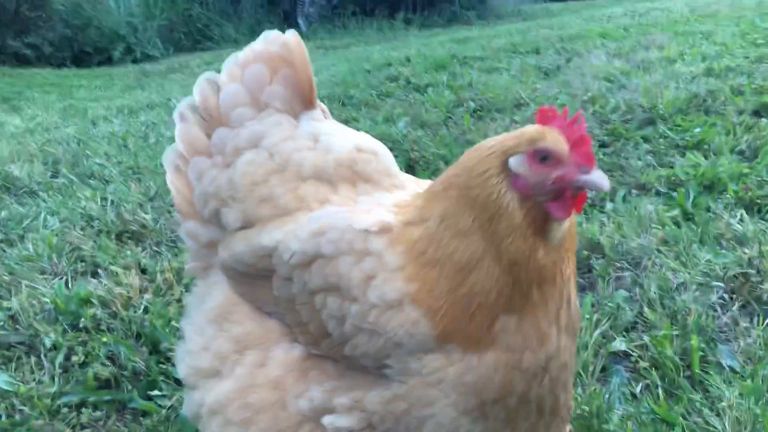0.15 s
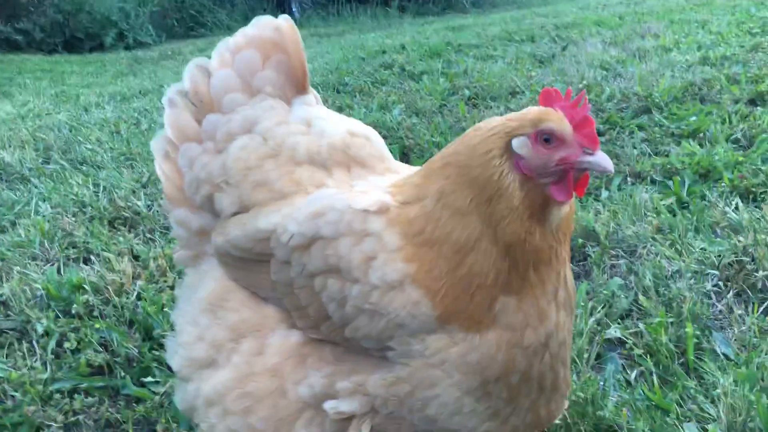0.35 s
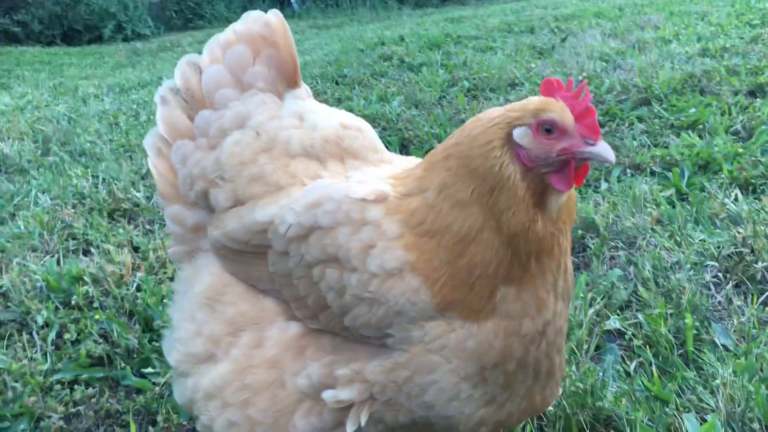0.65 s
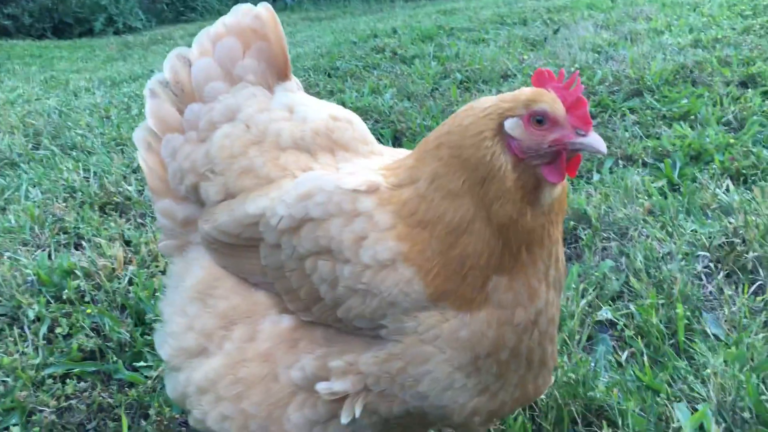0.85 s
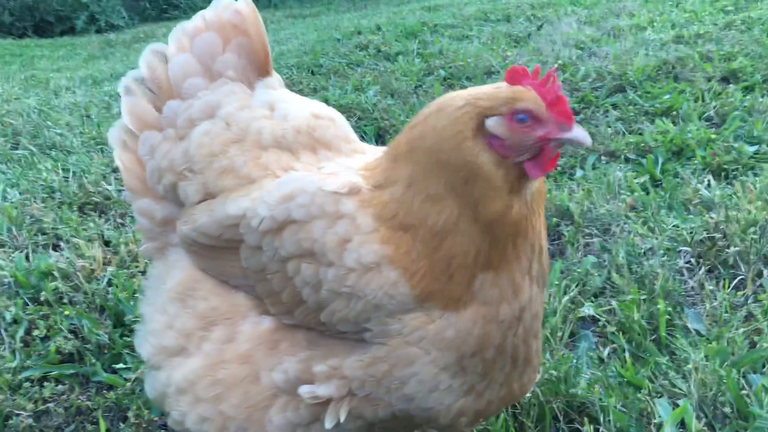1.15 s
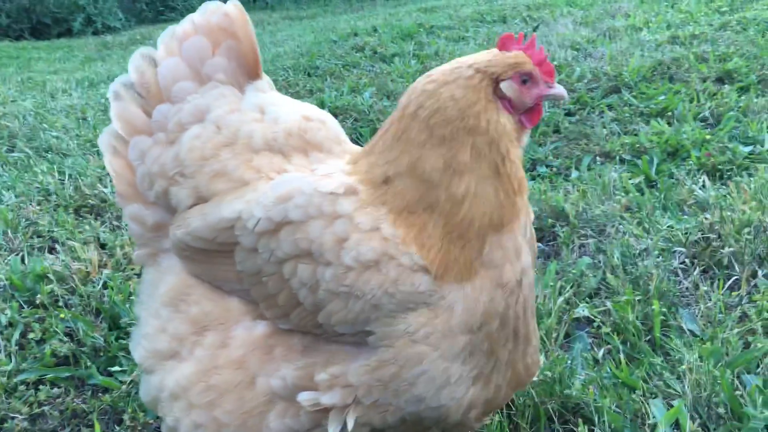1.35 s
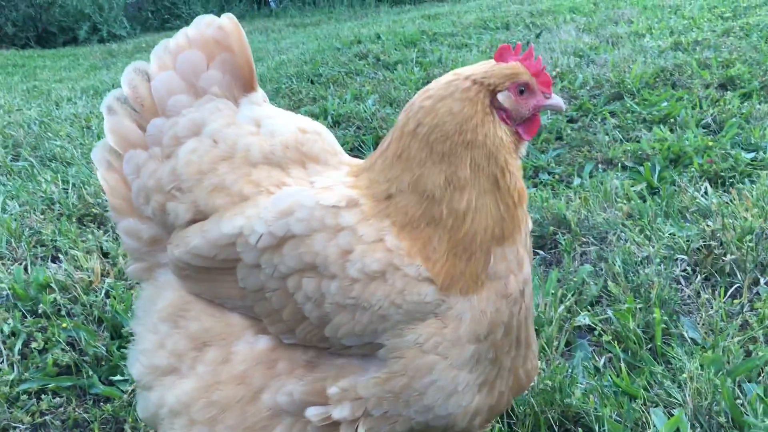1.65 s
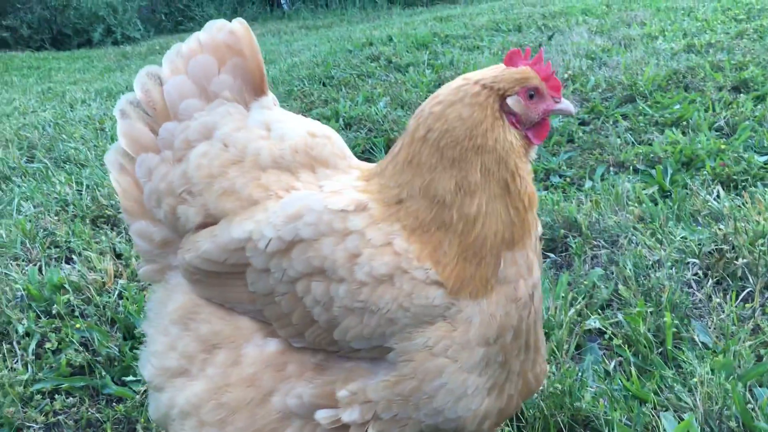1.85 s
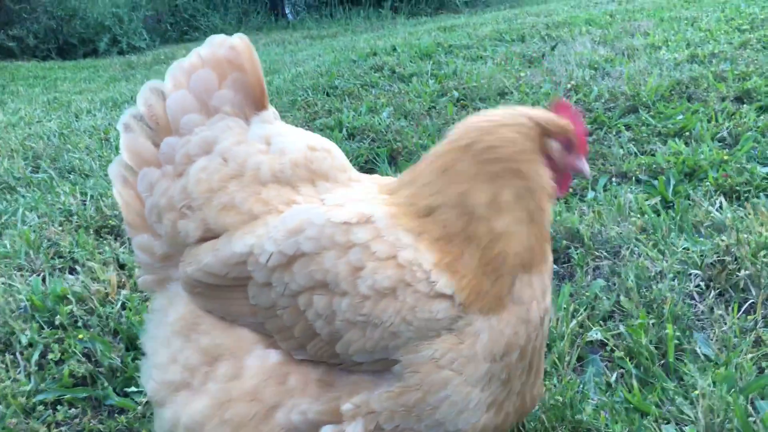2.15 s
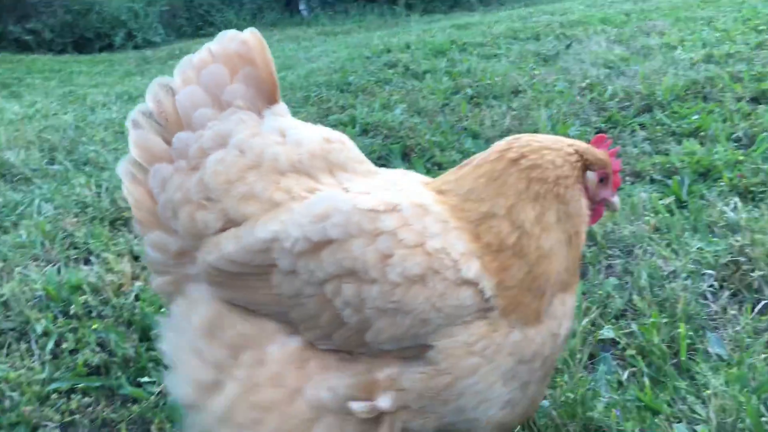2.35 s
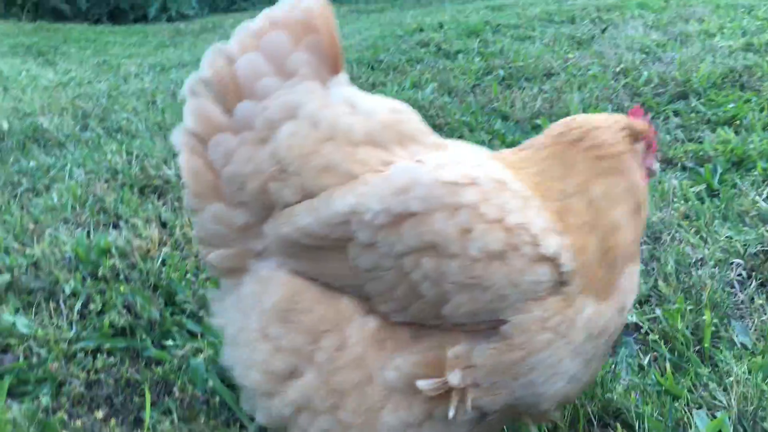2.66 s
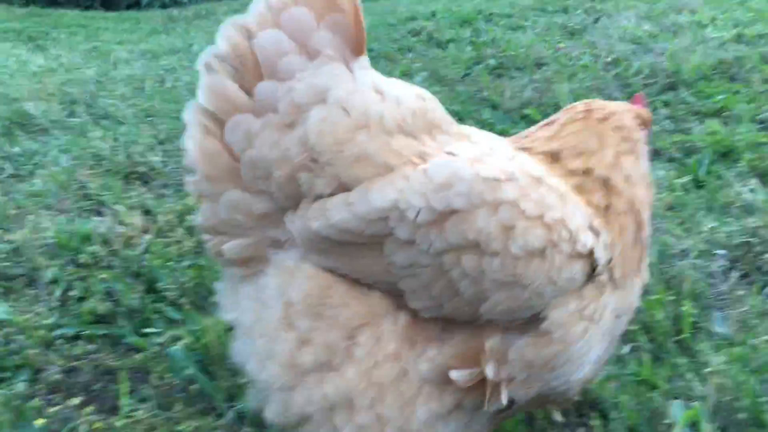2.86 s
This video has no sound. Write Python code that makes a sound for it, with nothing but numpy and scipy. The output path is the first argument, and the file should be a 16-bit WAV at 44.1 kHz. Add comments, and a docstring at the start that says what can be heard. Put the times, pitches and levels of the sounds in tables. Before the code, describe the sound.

Close hen calls on an open lawn: one dull cluck, a quick throaty rattle, a near-silent gap, then soft clucks and pops, over faint bird chirps, slight rustling and a low distant hum.

```python
"""On a lawn, a hen close by gives short clucks, single pops and one fluttering growl.
Her voice is made of membrane pulses and breath that ring windpipe, chest, beak and throat resonances.
Far birds chip and whistle as falling sine notes with a scattered echo.
Grass and feathers rustle as swells of grainy noise.
Distant traffic rumbles as coloured noise, with a hum made by a narrow noise resonance."""
import sys
import numpy as np
from scipy import signal
from scipy.io import wavfile
from scipy.ndimage import uniform_filter1d

SR = 44100
rng = np.random.default_rng(int(sys.argv[2]) if len(sys.argv) > 2 else 0)


def attenuation_scalar(level_db):
    """Turn a level in dB into a linear amplitude multiplier (20 dB per decade)."""
    decades = np.asarray(level_db, float) / 20
    return 10 ** decades


def output_pcm(signal):
    """Save a mono or channel-first signal as 16-bit PCM at the path in sys.argv[1].

    Samples are clipped to [-1, 1] before scaling.
    """
    pcm = np.clip(np.atleast_2d(signal).T, -1, 1) * 32767
    wavfile.write(sys.argv[1], SR, np.round(pcm).astype(np.int16))


N = 132300  # samples, 3 s


def rms_one(x):
    """Scale to rms 1."""
    return x / np.sqrt(np.mean(x ** 2) + 1e-20)


def add(out, start_s, piece):
    """Mix a piece in at its start time, trimming what falls outside."""
    i = int(start_s * SR)
    piece = piece[max(-i, 0):max(N - i, 0)]
    out[max(i, 0):max(i, 0) + len(piece)] += piece


def resonance(x, hz, width_hz):
    """Two-pole resonance, gain 1 on top."""
    r = np.exp(-np.pi * width_hz / SR)
    feedback = [1, -2 * r * np.cos(2 * np.pi * hz / SR), r * r]
    return signal.lfilter([(1 - r * r) / 2, 0, (r * r - 1) / 2], feedback, x)


def double_resonance(x, hz, half_width_hz):
    """Two equal resonances in a row, each twice half_width_hz wide: steeper sides than one."""
    once = resonance(x, hz, 2 * half_width_hz)
    return resonance(once, hz, 2 * half_width_hz)


def lowpass(x, cut_hz):
    """Fourth-order filter that keeps the sound below cut_hz."""
    return signal.sosfilt(signal.butter(4, cut_hz, fs=SR, output="sos"), x)


def drift(rate_hz):
    """Random wandering, spread 1: noise smoothed by two equal poles, made at every 40th sample."""
    r = np.exp(-2 * np.pi * rate_hz * 40 / SR)
    noise = rng.standard_normal(N // 40 + 2002)
    slow = rms_one(signal.lfilter([1], [1, -2 * r, r * r], noise)[2000:])
    return np.interp(np.arange(N) / 40, np.arange(len(slow)), slow)


def coloured(spectrum, patchy_db):
    """Third-octave bands of noise, each with its level and slow flicker; rms 1."""
    out = 0
    white = rng.standard_normal((2, N + 8000))  # neighbouring bands use different noise
    edges = 22 * 2 ** np.arange(0, 9.7, 1 / 3)
    hz, db = np.transpose(spectrum)
    for k, (low, high) in enumerate(zip(edges, edges[1:])):
        bandpass = signal.butter(2, [low, high], "band", fs=SR, output="sos")
        band = signal.sosfilt(bandpass, white[k % 2])[8000:]
        level_db = np.interp(np.log(low * high) / 2, np.log(hz), db)
        out = out + band * attenuation_scalar(level_db + patchy_db * drift(9.0))
    return rms_one(out)


# colour of the far traffic and air: (pitch_hz, relative level_db per Hz)
FLOOR_COLOUR = [(15, -34), (25, -22.5), (49, -2), (75, -2.5), (115, -7), (150, -10), (237, -11), (271, -24),
                (301, -18.5), (404, -24), (588, -27), (729, -24.5), (790, -26), (978, -21.5), (1090, -20),
                (1350, -22.5), (2930, -42), (3830, -44), (5570, -47.5), (7280, -50), (15000, -56)]
FLOOR_DB, HUM_DB = -50.5, -57  # rms levels
HUM_HZ, HUM_WIDTH_HZ = 91, 4


def background():
    """Far traffic and air as coloured noise; noise through a narrow resonance makes a wavering hum."""
    hum = resonance(rng.standard_normal(N + SR), HUM_HZ, HUM_WIDTH_HZ)[SR:]
    floor = coloured(FLOOR_COLOUR, patchy_db=0.5)
    return attenuation_scalar(FLOOR_DB) * floor + attenuation_scalar(HUM_DB) * rms_one(hum)


# swells of rustling grass and feathers: (centre_s, length_s, level_db)
RUSTLES = [(.005, .03, -69.5), (2.157, 0.005, -63), (2.18, 0.055, -72.5), (2.209, 0.018, -72),
           (2.607, 0.17, -70.5), (2.683, 0.058, -70.5), (2.929, 0.1, -63), (2.982, 0.053, -71)]
# colour of the rustling: (pitch_hz, relative level_db per Hz)
RUSTLE_COLOUR = [(1500, -20), (3000, -2), (4500, -2.5), (7000, -4.5), (10000, -7.5), (13000, -7),
                 (15500, -5)]


def rustles():
    """Bright noise under short swells; quick chance changes of level make it grainy."""
    swells = np.zeros(N)
    for centre_s, length_s, db in RUSTLES:
        add(swells, centre_s - length_s / 2, attenuation_scalar(db) * np.hanning(int(length_s * SR)))
    grain = attenuation_scalar(2.0 * drift(150.))
    return swells * coloured(RUSTLE_COLOUR, patchy_db=1.0) * grain


def far_notes(notes, echo_db, bend):
    """Falling sine notes with a noise echo that dies 60 dB per 0.7 s and stops after 0.5 s."""
    out = np.zeros(N)
    for start_s, length_s, first_hz, last_hz, db in notes:
        u = np.arange(int(length_s * SR)) / (length_s * SR)
        hz = last_hz + (first_hz - last_hz) * (1 - u) ** bend  # a higher bend falls sooner
        tone = np.sin(2 * np.pi * np.cumsum(hz) / SR)
        swell = np.sin(np.pi * u) ** .6
        add(out, start_s, attenuation_scalar(db + 3) * swell * tone)  # a sine peaks 3 dB above its rms
    decay = attenuation_scalar(-60 * np.arange(SR // 2) / SR / .7)
    tail = rng.standard_normal(SR // 2) * decay
    echo = signal.fftconvolve(out, tail / np.linalg.norm(tail))[:N]
    return out + attenuation_scalar(echo_db) * echo


# chips of far birds: (start_s, length_s, first_hz, last_hz, level_db)
CHIPS = [(.489, 0.024, 5390, 5060, -66), (1.628, 0.022, 5480, 5030, -62.5)]


def chips():
    """Very short far notes whose pitch falls fastest at the start."""
    return far_notes(CHIPS, echo_db=-3, bend=2.2)


# whistles of far birds: (start_s, length_s, first_hz, last_hz, level_db)
WHISTLES = [(1.62, 0.062, 3000, 2650, -70.5), (2.03, 0.11, 2750, 2340, -69.5),
            (2.13, 0.017, 2700, 2450, -62), (2.565, 0.033, 2780, 2525, -70.5),
            (2.79, 0.099, 4900, 4840, -76)]


def whistles():
    """Far notes that fall almost evenly, with a weaker echo than the chips."""
    return far_notes(WHISTLES, echo_db=-8, bend=1.18)


BODY_HZ, BODY_DB = 320, -9.5  # low chest resonance, gain
WINDPIPE_WIDTH_HZ, BEAK_HALF_WIDTH_HZ = 200, 180
RASP_CUT_HZ = 5900
BREATH_LINGERS, BURST_POINT = 1.3, 2.0  # in a burst: breath length over pulse length, pointedness
JITTER, SHIMMER_DB = .025, 1.5  # unevenness of pulse timing (share of pitch) and of pulse strength
GLIDE_FROM, LEAP_DB = .72, -2  # first share of the slow pitch; pulse strength after the leap
SECOND_BEAK, SECOND_BEAK_DB = 1.3, -6  # upper beak resonance: multiple of beak pitch, gain before treble_db
# other throat resonances, one below the beak's pitch stronger than the beak:
# (pitch_hz, half_width_hz, gain_db over the beak's, before treble_db)
THROAT = [(1291, 173, 5), (2066, 90, -6.5), (5720, 230, -22.5), (7200, 170, -18.5), (8350, 430, -13)]


def voice(length_s, slow_hz, leap, rise, windpipe_hz, db, beak_hz, rasp_db, treble_db, fall):
    """Membrane pulses and breath under a swell ring the windpipe, chest, beak and throat."""
    is_burst = leap == 0  # leap, rise and fall are shares of the length
    noise = rng.standard_normal((2, 2600))
    u = np.arange(2600) / (length_s * SR)
    swell = np.clip(np.minimum(u / rise, (1 - u) / fall), 0, 1) ** (BURST_POINT if is_burst else 1)
    puff_u = np.clip(u / (BREATH_LINGERS if is_burst else 1), 0, 1)
    puff = np.sin(np.pi * puff_u) ** (.8 if is_burst else .35)

    # slow pulses glide up, then leap to the windpipe's pitch at a pulse
    slow = slow_hz * np.interp(u, [0, leap / 2], [GLIDE_FROM, 1])
    beats = np.cumsum(slow) / SR + .5
    leap_beat = np.round(beats[int(leap * length_s * SR)])
    before = (beats < leap_beat) & (leap > 0)
    pitch = np.where(before, slow, windpipe_hz)
    wobble = rms_one(uniform_filter1d(noise[0], size=60))
    cycles = np.cumsum(pitch * (1 + JITTER * ~before * wobble)) / SR + .5

    strength = np.where(u < leap, 1, attenuation_scalar(LEAP_DB)) * attenuation_scalar(SHIMMER_DB * noise[0])
    pulses = np.diff(np.floor(cycles), prepend=0) * swell * strength
    # breath is strongest right after each pulse
    breath = noise[1] * puff * np.exp(-2.0 * (cycles % 1)) * np.sqrt(slow_hz / SR)

    windpipe = resonance(pulses, windpipe_hz, WINDPIPE_WIDTH_HZ)
    chest = resonance(pulses * (u < leap), BODY_HZ, 180.0) * attenuation_scalar(BODY_DB)
    soft = lowpass(windpipe + chest, 1300.)
    rasp = lowpass(.44 * pulses + 1.12 * breath, RASP_CUT_HZ)
    beak = double_resonance(rasp, beak_hz, BEAK_HALF_WIDTH_HZ)
    upper = beak
    for hz, half_width_hz, gain_db in THROAT + [(beak_hz * SECOND_BEAK, BEAK_HALF_WIDTH_HZ, SECOND_BEAK_DB)]:
        gain = attenuation_scalar(gain_db + treble_db * (hz > beak_hz))
        upper = upper + gain * double_resonance(rasp, hz, half_width_hz)
    return attenuation_scalar(db) * (soft / np.abs(soft).max() + attenuation_scalar(rasp_db) * upper / np.abs(beak).max())


# clucks: (start_s, length_s, slow_hz, share before the pitch leaps to the windpipe's,
# share spent swelling, windpipe_hz)
CLUCKS = [(.2477, .022, 335, .6, .3, 665), (2.1218, .013, 310, .5, .1, 705),
          (2.4116, .026, 320, .64, .1, 660)]
# colour of each cluck: (level_db, beak_hz, rasp_db against the soft part, treble_db of the rasp)
CLUCK_COLOURS = [(-25.5, 3300, -25.5, 0), (-31, 4020, -26.5, 8.5), (-31, 3670, -21.5, 1.5)]


def clucks():
    """A few slow pulses that leap up to windpipe pitch."""
    out = np.zeros(N)
    for (start_s, *call), colour in zip(CLUCKS, CLUCK_COLOURS):
        add(out, start_s, voice(*call, *colour, fall=.3))
    return out


def bursts(rows):
    """Short swells of pulses at windpipe pitch; the shorter ones start more sharply."""
    out = np.zeros(N)
    for centre_s, length_s, db, hz, beak_hz, rasp_db in rows:
        rise = np.clip(36 * length_s, .15, .6)
        burst = voice(length_s, hz, 0, rise, hz, db, beak_hz, rasp_db, treble_db=-2, fall=1 - rise)
        add(out, centre_s - rise * length_s - 1.6 / hz, burst)  # the windpipe peaks a little late
    return out


# pops: (centre_s, length_s, level_db, windpipe_hz, beak_hz, rasp_db against the soft part)
POPS = [(.5495, .005, -31, 765, 3080, -25), (.5845, .007, -49, 790, 3010, -10),
        (.8342, .005, -39, 530, 3110, -15), (.8542, .005, -35, 530, 3110, -18),
        (.8592, .005, -40, 725, 3210, -15), (.8762, .005, -37, 545, 3060, -17),
        (1.1118, .008, -44, 655, 3010, -27), (2.142, .014, -36, 715, 2660, -28),
        (2.7313, .007, -38, 755, 3310, -20), (2.7361, .009, -34, 850, 3340, -22)]


def pops():
    """Single bursts at windpipe pitch."""
    return bursts(POPS)


# flutter of the throat in the growl: (time_s, beats so far)
FLUTTER = [(.6402, 0.), (.659, 1.), (.715, 4.), (.7345, 5.), (.812, 9.), (.829, 10.), (.8455, 11.),
           (.867, 12.), (.8855, 13.)]
# course of the growl: (time_s, level_db, burst length_s, windpipe_hz, beak_hz, rasp_db against the soft part)
GROWL = [(0.645, -38.5, 0.0069, 830, 2770, -7), (0.662, -27.5, .011, 835, 2800, -18),
         (0.683, -33.5, 0.0072, 889, 3000, -16), (0.692, -27.5, 0.0087, 805, 2970, -16),
         (0.719, -28, .012, 849, 2910, -20), (0.74, -19.5, .013, 819, 3180, -25),
         (0.745, -23.5, .015, 796, 3070, -23.5), (0.78, -25, 0.012, 750, 3160, -30.5),
         (0.808, -21, 0.013, 760, 3140, -25.5), (0.834, -33.5, .011, 707, 3130, -33),
         (0.892, -33.5, .012, 742, 3120, -33)]


def growl():
    """The throat flutters: fourteen bursts, their settings read off between the table's points."""
    flutter_s, beats = np.transpose(FLUTTER)
    point_s, db, length_s, windpipe_hz, beak_hz, rasp_db = np.transpose(GROWL)
    rows = []
    for beat_s in np.interp(np.arange(14), beats, flutter_s):
        settings = [np.interp(beat_s, point_s, course)
                    for course in (length_s, db, windpipe_hz, beak_hz, rasp_db)]
        rows.append((beat_s, *settings))
    return bursts(rows)


def hen():
    """All calls of the one hen, made by the same voice."""
    return clucks() + pops() + growl()


def scene():
    """All sources, one channel."""
    return (background() + rustles() + chips() + whistles() + hen())[None]


def band_limit(x):
    """A steep low-pass at the top of the band."""
    return signal.sosfilt(signal.butter(12, 15620, fs=SR, output="sos"), x)


DIP_HZ, DIP_WIDTH_HZ, DIP_DEPTH = 10480, 400, .5  # depth as a share of the level
CUTOFF_HZ = 15900


def record(dry):
    """The microphone has a dip in its treble, and a steep filter cuts the top."""
    heard = dry - DIP_DEPTH * resonance(dry, DIP_HZ, DIP_WIDTH_HZ)
    top_cut = signal.cheby2(20, 50, CUTOFF_HZ, fs=SR, output="sos")
    mix = signal.sosfilt(top_cut, heard)
    return band_limit(mix)


dry = scene()
out = record(dry)
output_pcm(out)
```